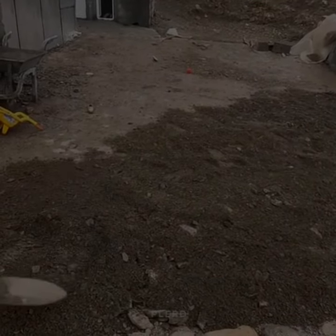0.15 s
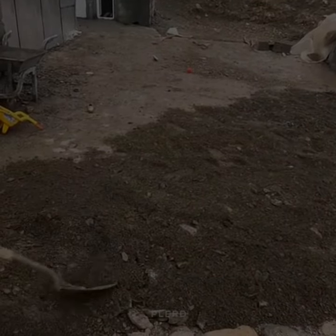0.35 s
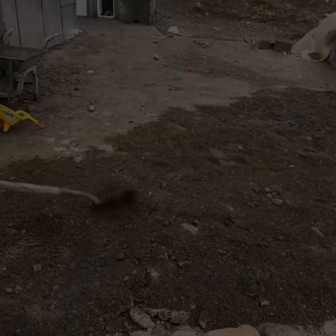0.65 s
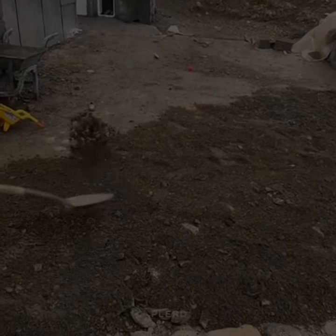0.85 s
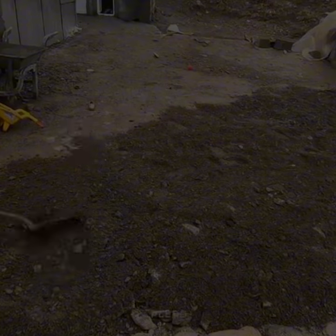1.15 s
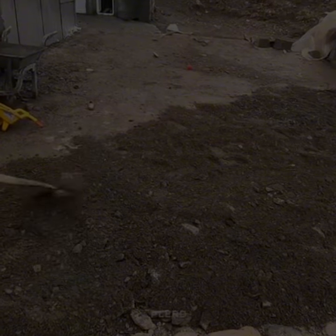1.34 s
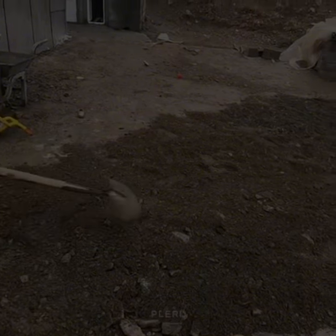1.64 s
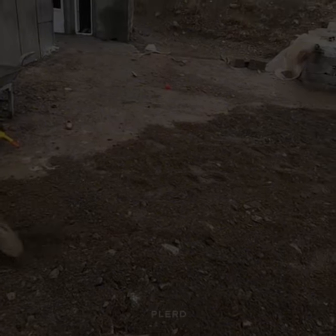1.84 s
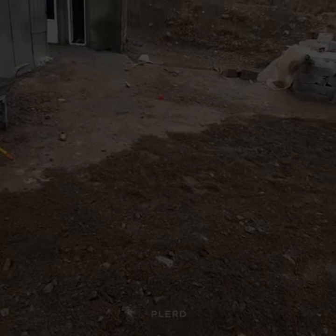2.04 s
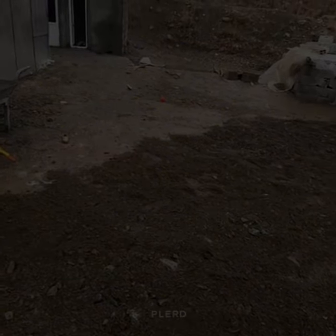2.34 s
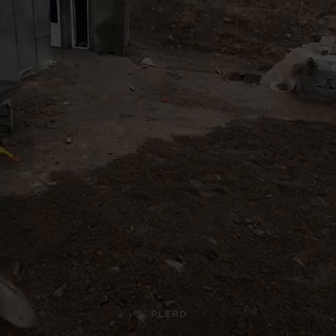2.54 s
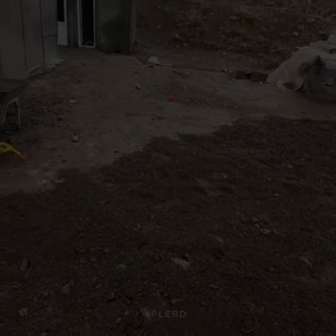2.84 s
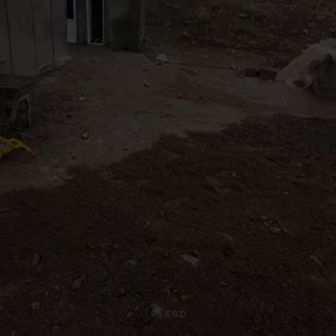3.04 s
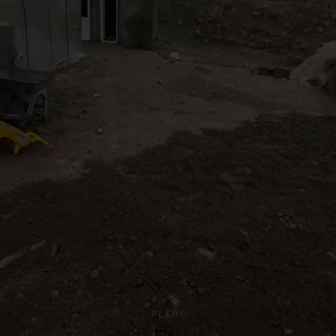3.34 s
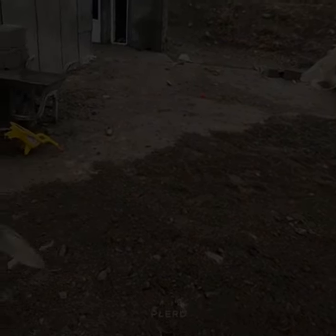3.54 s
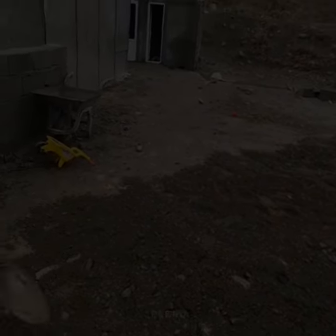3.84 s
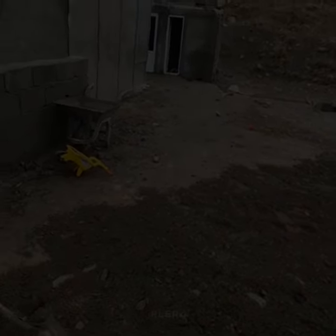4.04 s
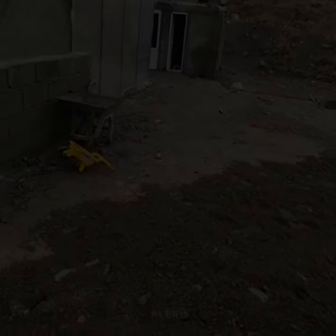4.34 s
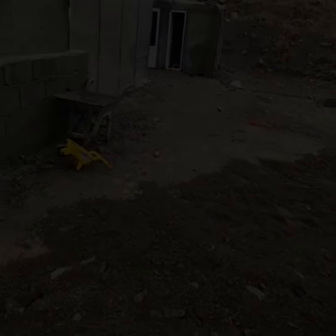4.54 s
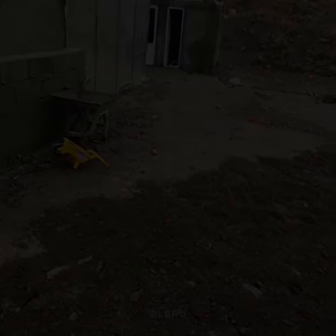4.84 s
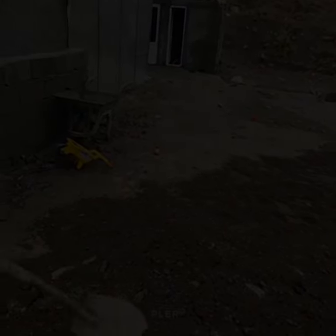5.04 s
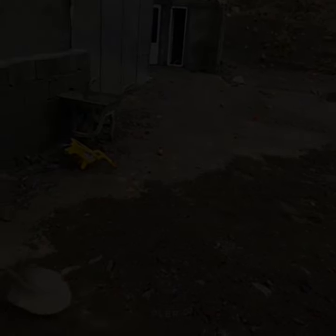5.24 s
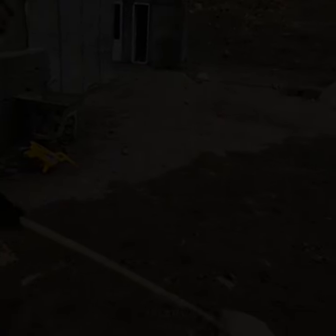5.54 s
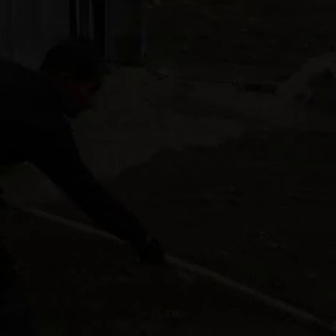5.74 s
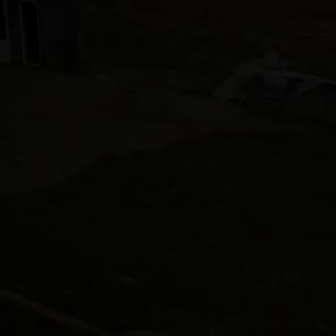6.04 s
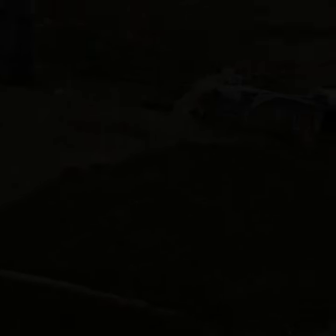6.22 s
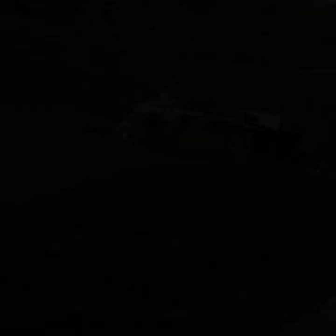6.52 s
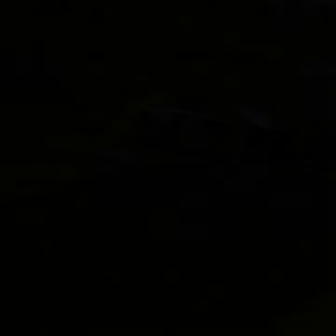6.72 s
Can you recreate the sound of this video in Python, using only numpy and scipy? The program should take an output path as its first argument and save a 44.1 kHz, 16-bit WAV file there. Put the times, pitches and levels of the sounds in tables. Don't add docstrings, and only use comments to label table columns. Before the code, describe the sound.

A steel shovel bites and scrapes gravelly soil outdoors, stones clicking and loose grit pattering, building to a busy, loud finish over faint wind.

```python
import sys
import numpy as np
from scipy import signal
from scipy.fft import rfft, irfft
from scipy.io import wavfile
from scipy.ndimage import uniform_filter1d, map_coordinates

SR = 44100
rng = np.random.default_rng(int(sys.argv[2]) if len(sys.argv) > 2 else 0)


def waveform_to_disk(signal):
    frames = np.transpose(np.atleast_2d(signal))
    scaled = np.clip(frames, -1, 1) * 32767
    samples = np.round(scaled).astype(np.int16)
    wavfile.write(sys.argv[1], SR, samples)


def ratio_of_db(decibels):
    return 10 ** (np.asarray(decibels, float) / 20)


N = 303259


def unit(x):
    return x / np.sqrt(np.mean(x ** 2) + 1e-20)


def along(points, hz):
    f, v = np.transpose(points)
    return np.interp(np.log(hz + 1), np.log(f + 1), v)


def curves(rows):
    s, *cols = np.transpose(rows)
    return [np.interp(np.arange(N) / SR, s, c) for c in cols]


def wobble(rate):
    knots = rng.standard_normal(int(N * rate / SR) + 4)
    return map_coordinates(knots, [np.arange(N) * rate / SR])


def body(spectrum, modes=(), modes_db=0):
    hz = np.fft.rfftfreq(4096, 1 / SR)
    peaks = sum(ratio_of_db(db + modes_db) ** 2 / (1 + (2 * (hz - c) / w) ** 2) ** 2 for c, w, db in modes)
    gain = np.sqrt(ratio_of_db(along(spectrum, hz)) ** 2 + peaks) + 1e-6
    cepstrum = irfft(np.log(gain))
    cepstrum[1:len(hz) - 1] *= 2
    cepstrum[len(hz):] = 0
    response = irfft(np.exp(rfft(cepstrum)))
    return response / np.linalg.norm(response)


def through(x, response):
    return signal.fftconvolve(x, response[None], axes=1)[:, :N]


def pair(a, b, alike):
    turn = np.arccos(np.clip(alike, -1, 1)) / 2
    middle, edge = np.cos(turn) * a, np.sin(turn) * b
    return np.array([middle + edge, middle - edge])


def patches(depth_db):
    z = signal.stft(rng.standard_normal((2, N)), nperseg=256)[2]
    field = uniform_filter1d(rng.standard_normal(z.shape[1:]), size=3, axis=0)
    field = uniform_filter1d(field, size=7, axis=1)
    return unit(signal.istft(z * ratio_of_db(depth_db * unit(field)), nperseg=256)[1][:, :N])


def grains(rate, spread_db, share, patchy_db):
    hit, size, sign = rng.random((3, N))
    contacts = (hit < rate / SR) * ratio_of_db(-spread_db * np.log(size + .04)) * np.sign(sign - .5)
    a, b = patches(patchy_db)
    share = np.clip(share, 0, 1)
    return np.sqrt(1 - share) * a + np.sqrt(share) * unit(contacts), b


def hump(ms, rise, fall, sharp):
    return np.exp(-np.where(ms < 0, -ms / max(rise, 1), ms / max(fall, 1)) ** sharp)


def swells(rows, wander, sharp):
    half = SR // 5
    out, t = np.zeros(N + 2 * half), np.arange(-half, half) / SR
    all_kicks = rng.standard_normal((len(rows), 2 * half))
    for (s, hz, db, rise, fall), kicks in zip(rows, all_kicks):
        shake = wander * min(rise / 4, 1) * np.cumsum(kicks)
        tone = np.sin(2 * np.pi * hz * t + shake)
        out[round(s * SR):][:len(t)] += ratio_of_db(db) * hump(1e3 * t, rise, fall, sharp) * tone
    return out[half:half + N]


# time in seconds, strength in dB.
SLIDING = [(0, -55), (.5, -67), (.76, -72), (1.1, -57.5), (1.57, -60), (2.05, -61), (2.83, -55.5),
           (2.97, -58), (4.75, -58.5), (4.94, -64), (5.45, -56.5), (5.69, -46), (5.73, -45), (5.85, -52),
           (6.32, -44.5), (6.48, -54), (6.7, -60), (6.88, -54)]
SLIDE_SAND_DB, SAND_GROWS = -5, 2.47
HUSH_DB, HUSH_GROWS = -58, 0.18
GRAINY = .17


def gravel():
    grit, thud, sand = swarms()
    (slide_db,), (sandy_db,) = curves(SLIDING), curves(SANDINESS)
    sand_db = SLIDE_SAND_DB + sandy_db - 58 + SAND_GROWS * (slide_db + 58)
    hush_db = HUSH_DB + HUSH_GROWS * gust()
    near = grit / (grit + ratio_of_db(slide_db + 3.0) ** 2)
    lumps = ratio_of_db(1.5 * wobble(60) + 1.3 * wobble(15) + 1.8 * wobble(170))

    slide, loose_sand = ratio_of_db(slide_db) ** 2, ratio_of_db(sand_db) ** 2
    blade = blade_grit(np.sqrt(grit + slide) * lumps, near)
    stirred = np.sqrt(grit + HEAVY_DUST * thud + 5.8 * sand + slide + 3.5 * loose_sand)
    cloud = dust(stirred, lumps)
    hiss = sand_hiss(np.sqrt(sand + loose_sand) * lumps, near)
    lows = clods(np.sqrt(thud + ratio_of_db(hush_db) ** 2), near)
    lean = np.array([[1], [-1]])
    return ratio_of_db(-3.5) * blade + ratio_of_db(DUST_SIDE_DB * lean) * cloud + ratio_of_db(-5.5) * hiss + ratio_of_db(-2.02) * lows


# peak in seconds, grit in dB, thud in dB against grit, length in ms.
BITES = [(1.111, -41, 5, 13), (1.839, -30.5, -8.5, 17.2), (1.943, -44, -7, 18), (2, -46, -19, 30),
         (2.313, -39.5, -12, 15.3), (3.075, -33.5, -11.5, 24.6), (3.38, -25, -13.5, 12.5),
         (3.435, -22, -15, 13.7), (3.478, -41, 4.5, 12.2), (3.736, -34.5, -16, 15),
         (3.772, -34.5, -15, 18.6), (4.101, -29, -59, 11.4), (4.216, -42.5, -7, 36),
         (4.262, -32.5, -4, 15.4), (4.673, -20.5, -1.5, 12.4), (4.882, -28, 0, 11.8),
         (5.204, -30, -47, 16.3), (5.557, -26, -16, 14.6), (6.506, -35.5, -40, 21)]
# peak in seconds, grit in dB, thud in dB against grit, length in ms.
PATTER = [(.177, -51.5, -10, 86), (0.372, -42, -2.5, 50), (.518, -52, -2.5, 26), (1.022, -46, -3, 4.6),
          (1.356, -51, -31, 35), (1.535, -48, -16, 23), (1.89, -44.5, -8, 31), (2.1, -54.5, -7, 27),
          (2.144, -46, -7, 10), (2.218, -53, -6, 5.6), (2.901, -48.5, -8, 15), (2.929, -46, -3, 10.5),
          (4.157, -50, -5, 38), (4.493, -49, -30, 20), (5.249, -40, -14, 30), (3.18, -61, -48, 38),
          (4.027, -54, -1, 11), (4.581, -54.5, 0, 0.69), (5.347, -52.5, 1, 8.3), (5.42, -54, -33, 9),
          (5.47, -49, -34, 6.4), (1.18, -48, -10, 22), (2.645, -54, 2, 6.5), (2.77, -49.5, -6, 38),
          (3.127, -36, -4, 5), (5.606, -40.5, -21, 38), (6.005, -38, -8, 5), (6.125, -41, -36, 16),
          (6.64, -38, -19, 50)]
# peak in seconds, grit in dB, thud in dB against grit, length in ms.
LANDINGS = [(.124, -53.5, 3, 15), (.439, -51, -1, 230), (0.622, -49, -9, 18), (1.596, -42.5, -8, 17),
            (2.471, -44.5, -16, 30), (3.116, -29.5, -12.5, 10.5), (4.419, -50, -11, 160),
            (5.949, -42, -23, 33), (6.041, -37, -15, 18), (.28, -68, 16, 15), (6.227, -33, -9.5, 24)]
# peak in seconds, grit in dB, thud in dB against grit, length in ms.
KNOCKS = [
    (1.15, -41, -2.5, 51),
    (1.461, -32.5, -15, 12),
    (2.68, -31, -24, 19.3),
    (5.701, -32.5, -11, 72),
    (5.844, -27.5, 0.5, 8.8),
    (5.982, -28.5, -19, 17.4),
    (6.063, -37.5, -50, 66),
    (6.289, -29, -15, 57),
    (6.328, -24, -12, 15.7),
    (6.468, -36, -27, 69),
]
# peak in seconds, grit in dB, thud in dB against grit, rise in ms.
DRAGS = [
    (0.024, -44.5, 1.5, 30),
    (0.728, -42.5, -7.5, 21),
    (0.844, -49.5, -16, 79),
    (1.239, -45, -32, 192),
    (2.432, -45, -10, 48),
    (5.285, -50.5, -24, 81.6),
    (6.689, -41.5, -18, 121),
    (4.52, -52, -28, 40),
    (5.81, -46, -25, 60),
    (5.965, -45, -25, 30),
]
# time in seconds, sand in dB against grit.
SANDINESS = [(0, -2), (.2, -22), (.45, -31), (1.15, -43), (1.55, -7.5), (2.1, -2.5), (3.1, -4), (5.3, -4),
             (6.0, -3.5), (6.88, 0)]
BITE_RISE, PATTER_RISE, LANDING_RISE = 0.62, 0.87, 0.36
KNOCK_RISE_MS, KNOCK_RISE, DRAG_STOP_MS = 1, .022, 10
BITE_EDGE, LOOSE_EDGE = 1.25, 0.89
HEAVY_DULLS, LOUD_DULLS = 0.2, 0.2


def swarms():
    rows = [(*r, BITE_RISE * r[3], r[3]) for r in BITES]
    rows += [(*r, PATTER_RISE * r[3], r[3]) for r in PATTER]
    rows += [(*r, LANDING_RISE * r[3], r[3]) for r in LANDINGS]
    rows += [(*r, KNOCK_RISE_MS + KNOCK_RISE * r[3], r[3]) for r in KNOCKS]
    rows += [(*r, r[3], DRAG_STOP_MS) for r in DRAGS]
    power, t, (sandy_db,) = np.zeros((3, N)), np.arange(N) / SR, curves(SANDINESS)
    for k, (s, db, thud_db, _, rise, fall) in enumerate(rows):
        near = slice(max(0, round((s - .4) * SR)), round((s + .4) * SR))
        sand_db = sandy_db[round(s * SR)] - HEAVY_DULLS * (thud_db + 12) - LOUD_DULLS * (db + 38)
        edge = BITE_EDGE if k < len(BITES) else LOOSE_EDGE
        shape = hump(1000 * (t[near] - s), rise, fall, sharp=edge) ** 2
        power[:, near] += ratio_of_db(db + np.array([[0], [thud_db], [sand_db]])) ** 2 * shape
    return power


# frequency in Hz, level in dB.
GRIT_COLOUR = [(250, -69), (500, -7), (900, -8), (1300, -4.5), (4500, -8), (6500, -15), (8500, -34),
               (12000, -120)]
# frequency in Hz, width in Hz, level in dB.
BLADE_MODES = [(1250, 2200, -38), (1810, 330, 2.5), (2260, 340, 0), (2710, 120, -2.5), (3110, 1630, -3.5),
               (4160, 260, -49)]


def blade_grit(drive, near):
    a, b = grains(700, 4.6, GRAINY + 0.097 * near, patchy_db=2.5)
    return through(drive * pair(a, b, 0.019 + 0.22 * near), body(GRIT_COLOUR, BLADE_MODES, modes_db=-1.0))


# frequency in Hz, level in dB.
DUST_COLOUR = [(6000, -44), (8500, -13), (9500, -11), (11000, -11.5), (12800, -11), (14000, -20),
               (15000, -29), (16500, -120)]
DUST_DB, DUST_SIDE_DB, HEAVY_DUST = -32.5, 1.5, 2.2
DUST_GROWS, DUST_AT_DB = .86, -45


def dust(stirred, lumps):
    drive = ratio_of_db(DUST_AT_DB) * (stirred / ratio_of_db(DUST_AT_DB)) ** DUST_GROWS
    drive = drive * lumps * ratio_of_db(DUST_DB + 3.2 * wobble(4.26))
    return through(drive * pair(*grains(1500, 5, .3, patchy_db=3), .05), body(DUST_COLOUR))


# frequency in Hz, level in dB.
SAND_COLOUR = [(2500, -40.5), (3500, -8.5), (4800, -9.5), (6300, -7), (7800, -2), (8600, -10),
               (9500, -19.5), (10300, -33), (13000, -120)]


def sand_hiss(drive, near):
    a, b = grains(1100, 5.8, GRAINY + 0.16 * near, patchy_db=2.5)
    return through(drive * pair(a, b, 0.039 + 0.66 * near), body(SAND_COLOUR))


# frequency in Hz, level in dB.
CLOD_COLOUR = [(50, -51.5), (150, 2), (300, -1.5), (700, -4), (1000, -3.5), (1600, -5), (3000, -120)]


def clods(drive, near):
    a, b = grains(300, 8.3, 0.087, patchy_db=2.5)
    return through(drive * pair(a, b, 0.24 + 0.6 * near), body(CLOD_COLOUR))


# time in seconds, peak in dB, pitch in Hz.
STONES = [(1.8372, -17, 2730), (2.6808, -20, 2190), (2.7142, -23, 3220), (3.0709, -19, 1760),
          (3.1128, -21, 1910), (3.3727, -14, 2230), (3.4316, -16, 3450), (3.7364, -21, 2250),
          (4.1076, -14, 2210), (5.2026, -19, 1650), (5.5598, -10, 1300), (5.8446, -15, 2300),
          (5.882, -17, 3900), (6.2884, -16, 4370), (6.2936, -12, 3600), (6.0705, -25, 7000),
          (6.2243, -25, 3000), (6.4672, -27, 2240), (6.5655, -9, 3400), (6.5934, -11, 7800)]
# time in seconds, peak in dB, pitch in Hz.
PEBBLES = [(.3691, -35, 1500), (.7302, -36, 999), (.7527, -41, 1450), (1.073, -27, 3060),
           (1.1099, -32, 2380), (1.1493, -27, 2700), (1.4621, -24, 2400), (1.6796, -43, 2490),
           (2.848, -40, 3000), (3.937, -34, 7350), (4.358, -38, 1030), (.4374, -43, 3000),
           (.6105, -46, 1670), (1.9435, -33, 2210), (2.0921, -44, 5000), (2.3101, -34, 2500),
           (2.4305, -38, 6500), (2.4628, -39, 5000), (4.161, -38, 7500), (4.189, -42, 5000),
           (6.0085, -30, 3500), (6.0352, -33, 2730), (4.5381, -38, 3000), (4.9861, -41, 2500)]
# time in seconds, peak in dB, pitch in Hz.
CLUNKS = [(.2653, -44, 1320), (.3027, -42, 1580), (1.0161, -41, 1200), (1.1024, -29, 900),
          (3.1265, -22, 1900), (3.4795, -29, 1200), (4.2685, -19, 900), (4.8848, -11, 3200),
          (1.8322, -19, 2400), (4.2627, -11, 1970), (5.5774, -17, 900), (5.7049, -26, 1580),
          (5.9808, -25, 1600), (6.0636, -22, 1770), (6.2975, -20, 2400), (6.3275, -13, 1780),
          (6.3305, -19, 1000), (6.3355, -20, 2600), (6.5106, -21, 1500)]
# frequency in Hz, level in dB.
PORT_COLOUR = [(40, -37.5), (140, 0.5), (8500, 3), (9600, -25), (10500, -25), (13000, -44), (16000, -60)]
STONE_T60_S, CRACK_DB, CRACK_SANDY = .009, -12, 1.1
SNAP_DB, SNAP_T60_S = 4, .0035
STONE_PUSH_DB, PEBBLE_PUSH_DB, CLUNK_PUSH_DB = -54, -6, -14
CLUNK_DULL_DB = -13


def stones():
    out, t, (sandy_db,) = np.zeros(N + SR), np.arange(SR // 10) / SR, curves(SANDINESS)
    rows = [(*r, STONE_PUSH_DB, 0) for r in STONES]
    rows += [(*r, PEBBLE_PUSH_DB, 0) for r in PEBBLES]
    rows += [(*r, CLUNK_PUSH_DB, CLUNK_DULL_DB) for r in CLUNKS]
    noises = rng.standard_normal((len(rows), 2, len(t)))
    for (s, db, hz, push_db, dull_db), (shake, crack) in zip(rows, noises):
        sandy = sandy_db[round(s * SR)]
        top = uniform_filter1d(crack, size=3 + round(-(dull_db + sandy) / 6))
        low = uniform_filter1d(crack, size=round(SR / hz) + 4)
        snap = ratio_of_db(SNAP_DB + dull_db / 2 - 60 * t / SNAP_T60_S) * (top - low)
        snap = snap * (1 - np.exp(-t * 4000))
        crack_db = CRACK_DB + dull_db + CRACK_SANDY * sandy
        fade = ratio_of_db(-60 * t / STONE_T60_S) * (1 - np.exp(-t * 5000))
        cycles = np.sin(2 * np.pi * hz * t + .2 * np.cumsum(shake))
        tick = fade * (cycles + ratio_of_db(crack_db + 10) * np.diff(crack, prepend=0)) + snap
        push = ratio_of_db(push_db) * np.sin(2 * np.pi * 300 * t / (1 + t / 0.0065)) * ratio_of_db(-60 * t / 0.0077)
        out[round((s + .0008) * SR):][:len(t)] += ratio_of_db(db - 1) * (tick / np.abs(tick).max() + push)
    return through(out[None, :N], body(PORT_COLOUR) * .65)


# peak in seconds, frequency in Hz, peak in dB, length in ms.
RUBBED = [(1.112, 2346, -40.5, 9.1), (1.115, 544, -38.5, 9.2), (1.838, 1033, -35.5, 8.1),
          (3.078, 1300, -41, 8.7), (3.118, 1910, -30, 8.3), (3.125, 377, -34.5, 14),
          (3.377, 2245, -24.5, 6.9), (3.377, 1250, -27.5, 9.8), (3.376, 3160, -36, 9.1),
          (3.435, 3480, -25.5, 8), (3.436, 1980, -45, 6.2), (3.439, 394, -32, 11.6),
          (3.478, 1860, -33.5, 2.3), (3.739, 2260, -31, 9.6), (3.778, 1866, -31.5, 7.1),
          (4.27, 545, -30.5, 6.4), (4.878, 3225, -27, 6.2), (5.249, 4420, -51, 23), (5.26, 794, -48, 7.1),
          (5.562, 830, -29.5, 9.9), (5.585, 883, -38, 17), (5.61, 2290, -45.5, 28), (5.995, 677, -35, 13.4),
          (6.067, 1770, -39, 9.4), (6.335, 543, -26, 5.5), (6.512, 1500, -30.5, 3.9),
          (.46, 2920, -52, 25), (1.18, 2920, -49, 25), (1.84, 7910, -36.5, 8), (1.945, 2120, -42.5, 8),
         (2.01, 2086, -49.5, 19), (2.69, 2540, -43, 11), (3.074, 1703, -38, 7.6), (3.076, 2760, -43, 8.1),
         (3.126, 2290, -35, 6.3), (3.376, 1586, -27.5, 9.4), (3.378, 5480, -38.5, 9.5),
         (3.38, 7700, -39, 9), (3.435, 2435, -31.5, 8), (3.437, 3970, -36, 6.9), (3.434, 7580, -32, 5.1),
         (3.738, 1863, -32.5, 8.7), (3.738, 5720, -41, 5), (3.737, 3620, -43, 11), (3.746, 4500, -40, 4.8),
         (3.777, 2750, -40, 5.2), (3.772, 3610, -39, 6.8), (4.105, 7000, -32, 7.5), (4.106, 2170, -37, 6.2),
         (4.258, 1490, -28.5, 8), (4.262, 3980, -30, 7.6), (4.234, 1800, -45, 2.9), (4.676, 683, -30.5, 11),
         (4.678, 2250, -21.5, 4.4), (4.672, 3950, -43, 4.8), (4.676, 8730, -32, 7.5), (4.681, 4970, -36, 6),
         (4.876, 1730, -33, 5.7), (4.878, 940, -31.5, 7.4), (4.895, 3300, -40, 7), (4.88, 5370, -40, 8),
         (5.605, 2990, -41, 10), (5.735, 2270, -42, 7.2), (5.95, 3400, -47, 9.9), (6.075, 7670, -44, 8),
         (6.272, 2360, -43, 7.9), (6.63, 7800, -45, 20)]
# time in seconds,
# frequency in Hz, peak in dB, fall in ms.
STRUCK = [(2.685, 2120, -41, 9.6), (4.214, 1850, -37, 6.2), (4.8867, 315, -13.5, 1.44),
          (4.887, 1587, -32.5, 18.3), (6.567, 1593, -30.5, 9.2), (4.265, 404, -25.5, 4.2),
          (4.8865, 756, -21, 1.6), (5.561, 690, -33, 4.8), (6.33, 880, -28, 4.6), (4.888, 193, -21.5, 5),
          (5.579, 760, -30, 6.3)]
SING_RISE, RING_RISE_MS = 0.99, 0.94


def song():
    rows = [(s, hz, db, SING_RISE * ms, ms) for s, hz, db, ms in RUBBED]
    rows += [(s, hz, db, RING_RISE_MS, ms) for s, hz, db, ms in STRUCK]
    return through(swells(rows, wander=0.135, sharp=1.36)[None], body(PORT_COLOUR) * .68)


# frequency in Hz, t60 in seconds.
YARD_T60 = [(200, 0.17), (2000, 0.13), (10000, 0.044)]


def yard(x):
    hz, t, z = signal.stft(rng.standard_normal((2, SR // 4)), SR, nperseg=256)
    decay = ratio_of_db(-60 * t / along(YARD_T60, hz)[:, None])
    tail = signal.istft(z * decay, SR, nperseg=256)[1]
    return signal.fftconvolve(x, tail / np.linalg.norm(tail[0]), axes=1)[:, :N]


# time in seconds, strength in dB.
WIND = [(0.0, -60), (0.46, -57), (0.8, -59), (1.26, -50), (1.82, -62), (2.1, -58.5), (3.02, -60.5),
        (3.52, -56.5), (3.75, -63.5), (4.62, -61), (4.72, -72), (5.02, -81), (5.08, -70), (5.34, -61.5),
        (5.66, -61.5), (6.03, -56), (6.87, -65.5)]


def gust():
    strength_db, = curves(WIND)
    return strength_db - strength_db.mean()


# frequency in Hz, level in dB.
BUFFET_COLOUR = [(12, -20), (25, 1.5), (50, -0.5), (90, -3), (130, -54), (300, -120)]
# frequency in Hz, level in dB.
RUMBLE_COLOUR = [(40, -73), (70, -33.5), (110, -2.5), (145, 0), (230, -5), (300, -8.5), (400, -16.5),
                 (700, -62), (2000, -120)]
# peak in seconds, frequency in Hz, peak in dB, rise in ms, fall in ms.
PUFFS = [(0.003, 173, -23.5, 0.96, 3.4), (.03, 158, -35, 7.3, 3.9), (.26, 120, -34.5, 5.1, 3.9),
         (0.305, 111, -35, 3.4, 4.6), (1.102, 48.4, -44, 69, 23), (1.25, 135, -37, 6.8, 16),
         (1.314, 68, -44, 16, 12), (1.387, 51, -42, 26, 36), (2.207, 55, -47, 11, 13),
         (2.295, 54, -40, 8.7, 9), (2.458, 57.5, -38, 19, 4.5), (3.364, 49.5, -42, 12, 30),
         (4.678, 141, -26.5, 9.6, 22), (4.686, 174, -34, 27, 10), (5.2, 124, -37, 6.7, 9.1),
         (5.333, 85, -36.5, 2.7, 4.6), (6.551, 105, -35, 16, 18)]
RUMBLE_DB, RUMBLE_GROWS = -56.5, 0.5


def wind():
    buffet_db, rumble_db = curves(WIND)[0], RUMBLE_DB + RUMBLE_GROWS * gust()
    buffet = through(ratio_of_db(0.83 * wobble(16)) * pair(*patches(1.2), 0.2), body(BUFFET_COLOUR))
    rumble = through(ratio_of_db(2.83 * wobble(23)) * pair(*patches(0.46), 0.82), body(RUMBLE_COLOUR))
    puffs = swells(PUFFS, wander=.015, sharp=1.8)
    return ratio_of_db(buffet_db + 1.5) * unit(buffet) + ratio_of_db(rumble_db + 1.5) * unit(rumble) + puffs


# time in seconds, left minus right in dB.
SHOVEL_SIDE = [
    (0.0, 0),
    (1.26, 1),
    (2.39, 4.5),
    (4.37, 2),
    (4.84, 3),
    (5.75, -1.5),
    (6.88, 4.5),
]
BASS_LEAN, BASS_HZ = 0.07, 700


def scene():
    soil, air = gravel(), wind()
    clicks, tones = stones(), song()
    shovel = soil + clicks + tones + yard(ratio_of_db(-12) * clicks + ratio_of_db(-17) * tones)
    bass = signal.lfilter(*signal.butter(1, BASS_HZ, fs=SR), shovel)
    shovel = shovel - BASS_LEAN * np.array([[1], [-1]]) * bass
    return shovel * ratio_of_db(curves(SHOVEL_SIDE)[0] * np.array([[.4], [-.4]])) + air


def band_limit(x):
    return signal.sosfilt(signal.butter(12, 15200, fs=SR, output="sos"), x)


# time in seconds, side level in dB.
FOLD = [
    (0, -0.5),
    (.15, -5.5),
    (.34, -12),
    (.4, -50),
    (1.25, -50),
    (1.3, -10),
    (1.9, -1),
    (6.88, 0.5),
]


def record(dry):
    mid = (dry[0] + dry[1]) / 2
    side = (dry[0] - dry[1]) / 2 * ratio_of_db(curves(FOLD)[0])
    return band_limit(np.array([mid + side, mid - side]))


dry = scene()
out = record(dry)
waveform_to_disk(out)
```